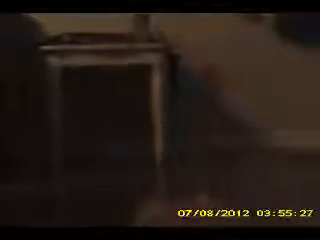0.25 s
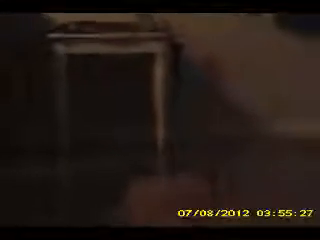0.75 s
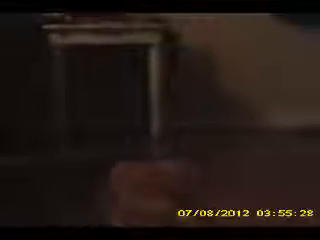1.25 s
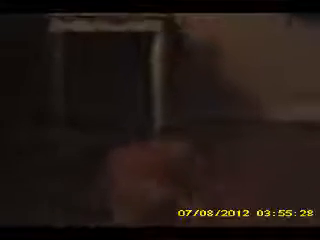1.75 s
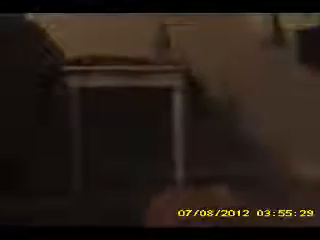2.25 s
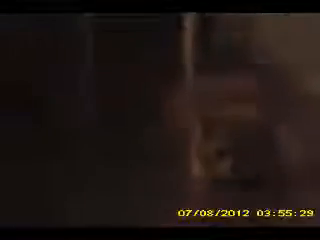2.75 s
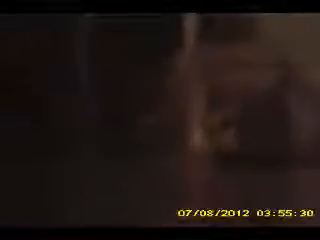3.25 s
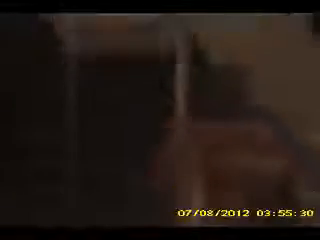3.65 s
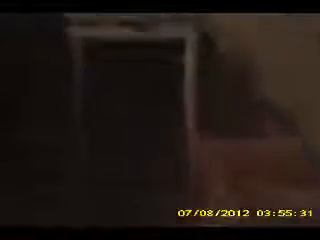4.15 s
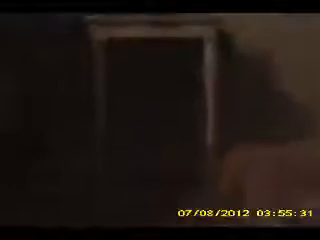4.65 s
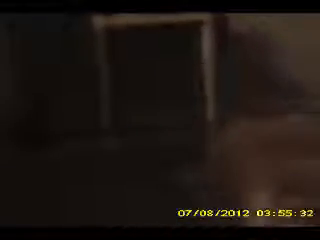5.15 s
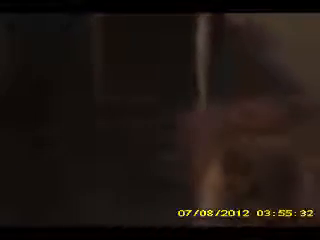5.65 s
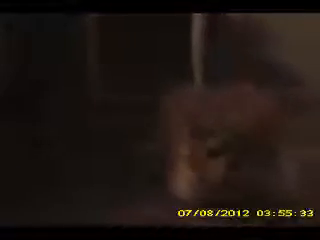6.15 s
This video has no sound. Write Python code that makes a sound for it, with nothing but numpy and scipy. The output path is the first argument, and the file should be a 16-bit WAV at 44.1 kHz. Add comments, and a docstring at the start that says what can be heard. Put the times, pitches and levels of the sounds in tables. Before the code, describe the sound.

A mini quadcopter hovers in a room, its propellers making a harsh, overloaded buzz very close, with a steady high whine and rushing air.

```python
"""Four two-bladed propellers of a mini quadcopter, hovering in a room, from a tiny microphone on its frame.
They hum and beat as the controller trims their speeds, two close to the capsule and two farther off.
The pulsed motor drive whines and the downwash rushes past. At this distance the sum overloads the
microphone, which turns the tones into a harsh buzz."""
import sys
import numpy as np
from scipy import signal
from scipy.fft import rfft, irfft
from scipy.io import wavfile

SR = 44100
rng = np.random.default_rng(int(sys.argv[2]) if len(sys.argv) > 2 else 0)


def file_out(sig):
    """Save sig as 16-bit WAV at sys.argv[1]."""
    # one column per channel
    cols = np.atleast_2d(sig).T
    # limit, then scale
    lim = np.clip(cols, -1, 1)
    pcm = np.round(lim * 32767).astype(np.int16)
    wavfile.write(sys.argv[1], SR, pcm)


N = 282328

ROCK_HZ, ROCK_DECAY_S = 4.56, .29
HUNT_SPREAD_HZ, HUNT_WIDTH_HZ = 2.6, 2.997   # rms pitch wander; how far its rate strays from ROCK_HZ
DRIVE_HZ, CUTOFF_HZ = 2020.4, 10650
WHINE_DB, WASH_DB, HISS_DB = -8.5, -7.5, -32.5


def propellers(drive_phase):
    """Four rotors at slightly different speeds beat against each other at the microphone."""
    # Tones reaching the capsule; rows: near slow, near fast, far slow, far fast rotor. (blade tone [dB],
    # its octave [dB], shaft hum [dB], its third harmonic [dB], lower sideband [dB], upper sideband [dB])
    rotor_levels = [(-10, -19, -27.5, -36, -36.5, -41), (-9.5, -19, -37.5, -38.5, -37, -39),
                    (-28.5, -30.5, -34, -26.5, -15.5, -23), (-16.5, -26, -39, -27, -20.5, -23.5)]
    return sum(rotor(pitch, levels, drive_phase) for pitch, levels in zip(blade_pitches(), rotor_levels))


def rotor(pitch, levels, drive_phase):
    """Blade tones, the hum of the unbalanced shaft, and sidebands of the whine modulated once per turn."""
    blade_db, octave_db, shaft_db, third_db, lower_db, upper_db = levels
    angle = np.pi * np.cumsum(pitch + hunting()) / SR   # two blades pass per turn of the shaft
    blades = tone(2 * angle, blade_db, flutter_db=0.95) + tone(4 * angle, octave_db, flutter_db=1.5)
    blades += tone(6 * angle, octave_db - 6.0, flutter_db=4.0)
    unbalance = tone(angle, shaft_db, flutter_db=2.0) + tone(3 * angle, third_db, flutter_db=2.5)
    sidebands = tone(drive_phase - angle, lower_db, flutter_db=3.5)
    sidebands += tone(drive_phase + angle, upper_db, flutter_db=4.0)
    return blades + unbalance + sidebands


def blade_pitches():
    """The controller mixes throttle, yaw and rocking into a blade-pass pitch in Hz for each propeller."""
    # Throttle, as the mean blade-pass pitch of the near propellers: (time [s], pitch [Hz])
    throttle_curve = [(-0.0, 595.3), (1.63, 587.3), (2.97, 591), (3.13, 614), (3.59, 586.4), (4.11, 592.8),
                      (4.16, 587), (5.84, 587.8), (6.4, 603.5)]
    # Yaw control slows one diagonal pair and speeds up the other: (time [s], shift each way [Hz])
    yaw_curve = [(0.0, 19.2), (0.78, 43.8), (1.23, 39.2), (2.53, 51), (3.12, 49.5), (3.22, 26), (3.49, 15),
                 (4.14, 20.5), (4.67, 37), (4.86, 31), (5.92, 50.6), (6.4, 29)]
    # Motor mix; rows: near slow, near fast, far slow, far fast. A diagonal's ends rock against each other.
    # (throttle offset [Hz], yaw [share], slow diagonal's rocking [share], fast diagonal's rocking [share])
    motor_mix = [(0, -1, 1, -0.00047), (0, 1, 0, 1), (-13, -.9, -.7, -0.0015), (0, .5, 0, -0.701)]
    t = np.arange(N) / SR
    throttle = np.interp(t, *np.transpose(throttle_curve))
    yaw = np.interp(t, *np.transpose(yaw_curve))
    slow, fast = rocking()
    return [throttle + offset_hz + yaw_share * yaw + slow_share * slow + fast_share * fast
            for offset_hz, yaw_share, slow_share, fast_share in motor_mix]


def rocking():
    """The craft tips and the controller rocks it level: a dying swing of pitch on each diagonal."""
    # Jolts to the craft: (time [s], kick on the slow diagonal [Hz], kick on the fast diagonal [Hz])
    jolts = [(0.531, 24, -16), (1.62, 22, -14), (2.37, -11, -10), (3.42, -6, -12), (3.6, -12, -7),
             (4.48, -13, -4), (5.341, -15, 11)]
    swing = np.zeros((2, N))
    for start, *kicks in jolts:
        age = np.maximum(np.arange(N) / SR - start, 0)
        swing += np.outer(kicks, np.exp(-age / ROCK_DECAY_S) * np.sin(2 * np.pi * ROCK_HZ * age))
    return swing


def hunting():
    """The controller never quite settles: a random swing of pitch, in Hz, near its rocking rate."""
    return HUNT_SPREAD_HZ * drift(HUNT_WIDTH_HZ, centre_hz=ROCK_HZ)


def drive_whine(drive_phase):
    """One steady clock switches all four motors, so they sing a single whine."""
    return tone(drive_phase, WHINE_DB, flutter_db=1.08)


def downwash():
    """Turbulent air thrown down past the frame, with a narrow low buzz shaped into the same noise."""
    # Rush of air, plus a narrow low buzz near 365 Hz from the overloaded microphone:
    # (frequency [Hz], relative density [dB])
    rush_and_buzz = [(25, -1.5), (90, -3.5), (220, -4.5), (320, -8), (365, 0.5), (410, -7), (500, -8),
                     (750, -4), (1000, -4), (1300, 2), (1850, 2.5), (2500, -4.5), (4000, -13), (10000, -29)]
    return noise(rush_and_buzz, WASH_DB)


def amplifier_hiss():
    """The noise floor of the microphone's own amplifier."""
    # Self-noise: (frequency [Hz], relative density [dB])
    hiss_spectrum = [(100, 1), (2000, 3), (4000, -10.5), (7000, -11.5), (10500, -17.5)]
    return noise(hiss_spectrum, HISS_DB)


def overload(x, top, knee):
    """The microphone flattens peaks at `top`; a larger knee makes a harder corner."""
    return x / (1 + np.abs(x / top) ** knee) ** (1 / knee)


def tone(phase, level_db, flutter_db):
    """A sine that flutters about the given rms level in the turbulent air."""
    level = from_db(level_db + flutter_db * drift(width_hz=14))
    return np.sqrt(2) * level * np.sin(phase + rng.uniform(0, 2 * np.pi))


def drift(width_hz, centre_hz=0):
    """Random wander with an rms of 1, at rates mostly within `width_hz` of `centre_hz`."""
    bins = np.arange(N // 2 + 1) * SR / N
    spectrum = rfft(rng.standard_normal(N)) / (1 + ((bins - centre_hz) / width_hz) ** 2)
    return rms_one(irfft(spectrum, N))


def noise(spectrum, level_db):
    """Steady noise of the given spectrum and rms level."""
    return from_db(level_db) * rms_one(colour(rng.standard_normal(N), spectrum))


def colour(x, points):
    """Filter by (frequency [Hz], gain [dB]) points, joined on a log-frequency axis."""
    hz, db = np.transpose(points)
    bins = np.maximum(np.arange(N + 1) * SR / (2 * N), 1)
    gain = from_db(np.interp(np.log(bins), np.log(hz), db))
    return irfft(rfft(x, 2 * N) * gain)[:N]


def from_db(db):
    """Decibels to gain."""
    return 10 ** (np.asarray(db) / 20)


def rms_one(x):
    """Scale to an rms of 1."""
    return x / np.sqrt(np.mean(x ** 2) + 1e-20)


def scene():
    """Propellers, whine and downwash as they arrive on the frame, in mono."""
    drive_phase = 2 * np.pi * DRIVE_HZ * np.arange(N) / SR
    return (propellers(drive_phase) + drive_whine(drive_phase) + downwash())[None]


def record(dry):
    """The tiny microphone overloads, dulls the treble and adds its own hiss; the top is cut."""
    # Response of the microphone stage after it overloads: (frequency [Hz], gain [dB])
    mic_response = [(30, -3), (600, 1.5), (2000, -2), (3000, -6), (5000, -12), (10000, -18.5)]
    buzz = colour(overload(dry[0], top=0.41, knee=11.0), mic_response)
    high_cut = signal.ellip(12, .1, 90, CUTOFF_HZ, fs=SR, output="sos")
    return signal.sosfilt(high_cut, buzz + amplifier_hiss())[None]


dry = scene()
out = record(dry)
file_out(out)
```